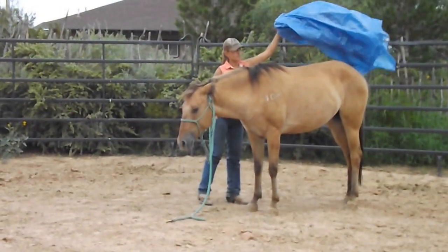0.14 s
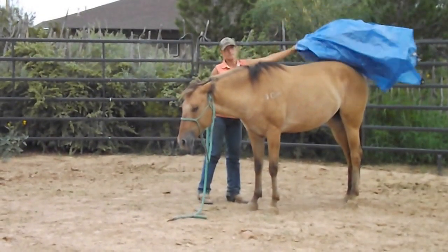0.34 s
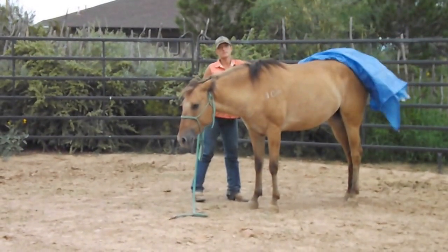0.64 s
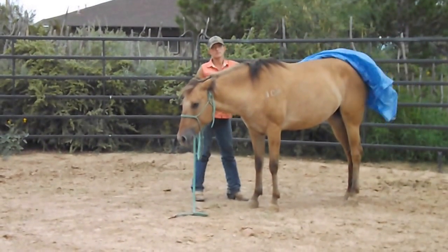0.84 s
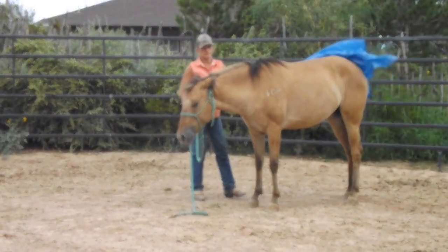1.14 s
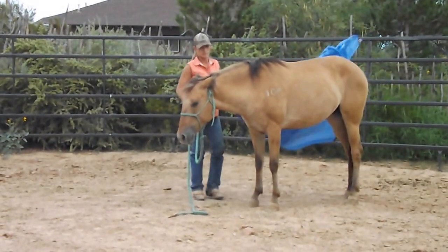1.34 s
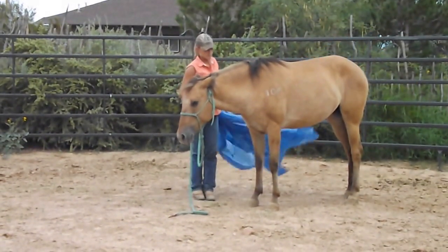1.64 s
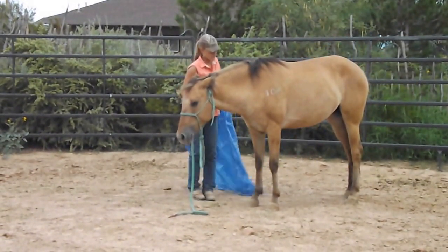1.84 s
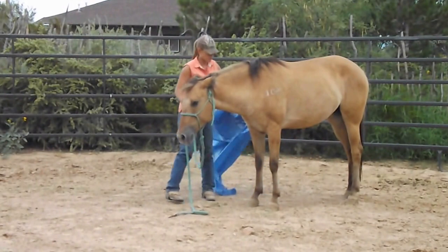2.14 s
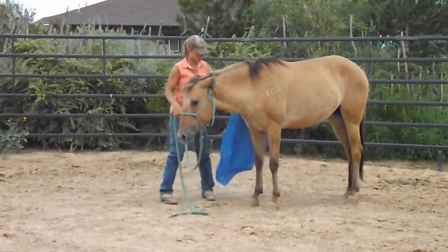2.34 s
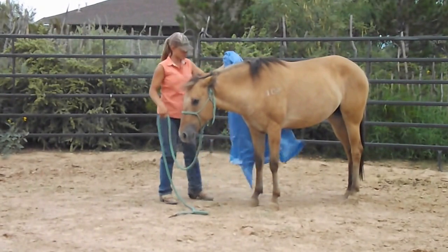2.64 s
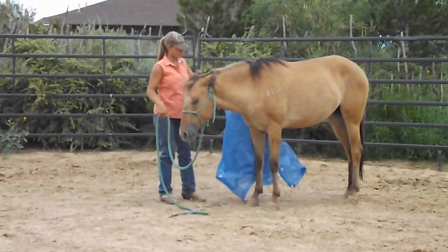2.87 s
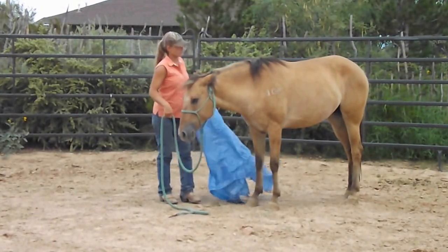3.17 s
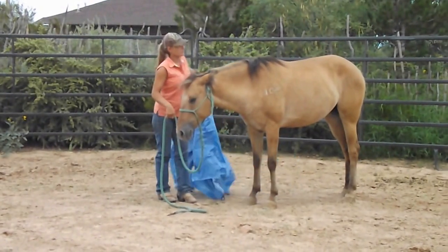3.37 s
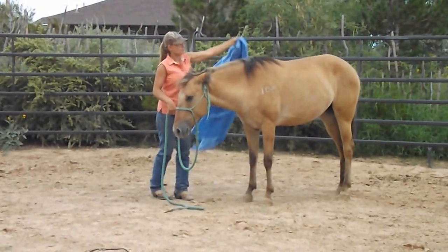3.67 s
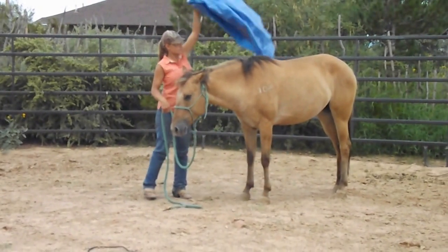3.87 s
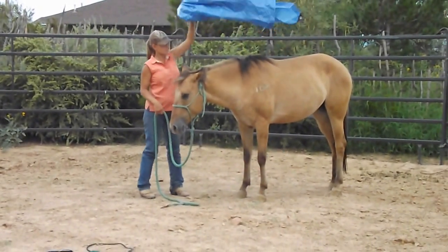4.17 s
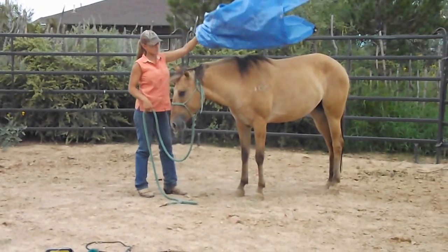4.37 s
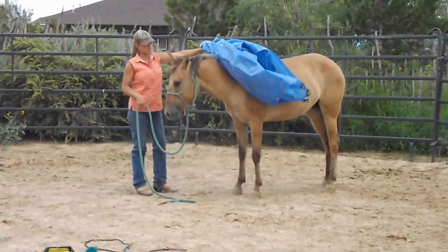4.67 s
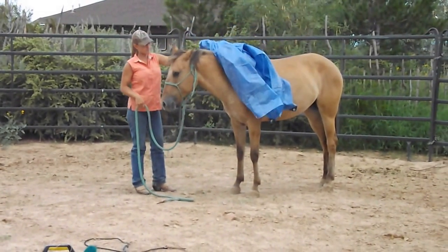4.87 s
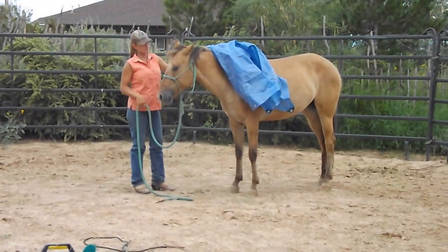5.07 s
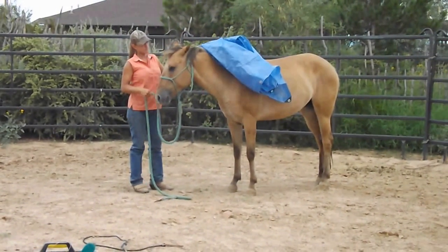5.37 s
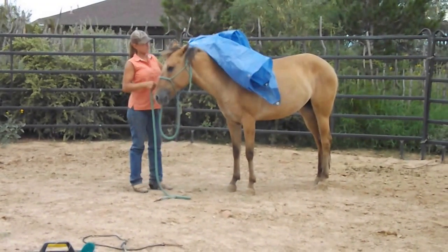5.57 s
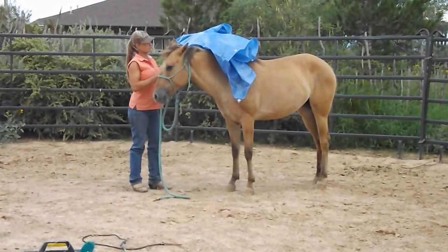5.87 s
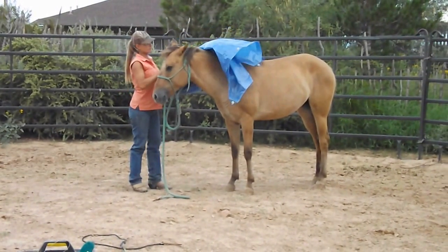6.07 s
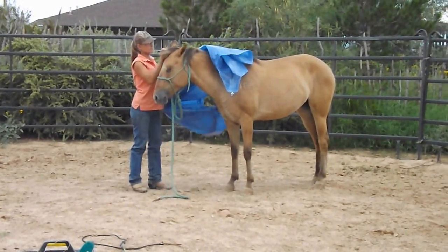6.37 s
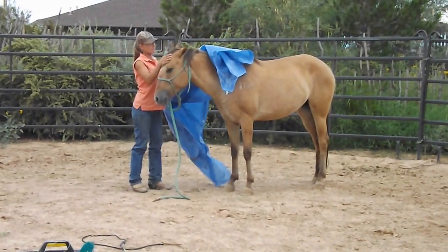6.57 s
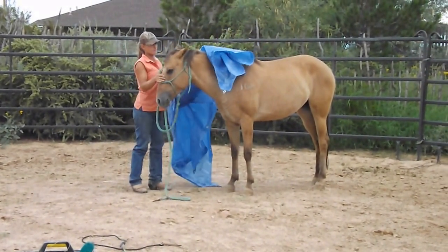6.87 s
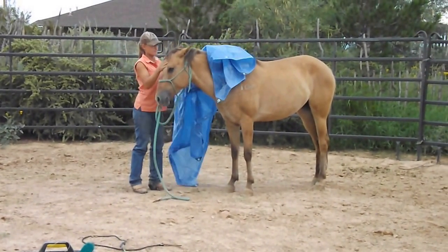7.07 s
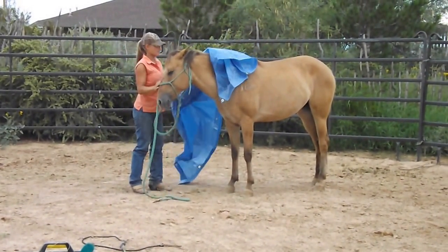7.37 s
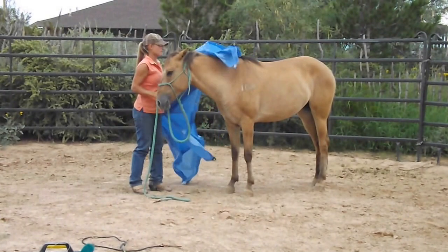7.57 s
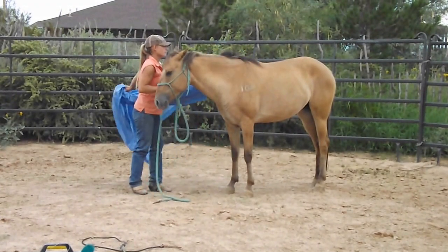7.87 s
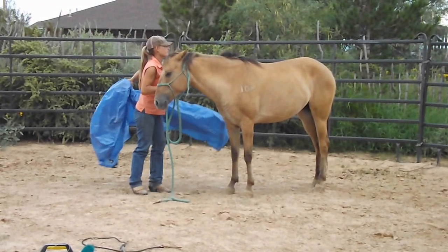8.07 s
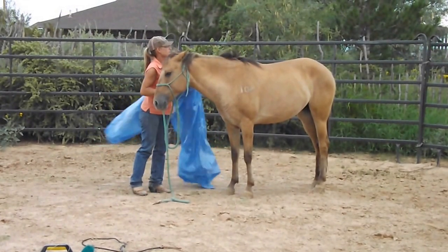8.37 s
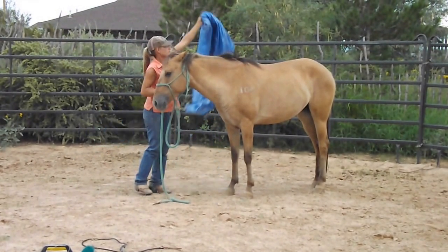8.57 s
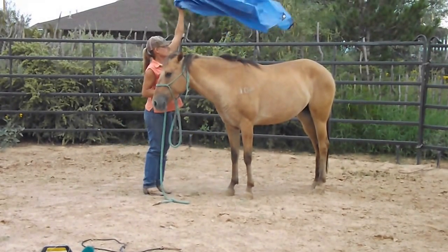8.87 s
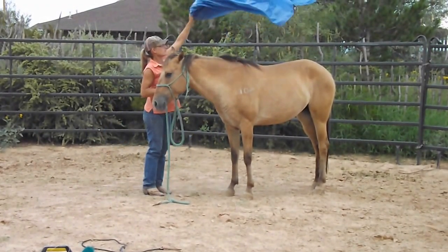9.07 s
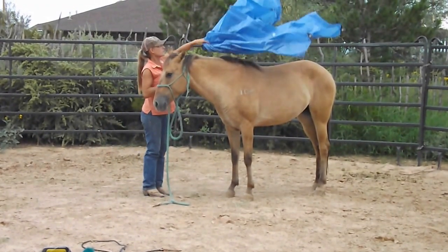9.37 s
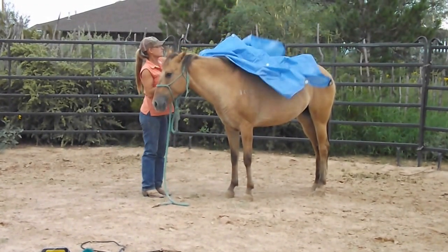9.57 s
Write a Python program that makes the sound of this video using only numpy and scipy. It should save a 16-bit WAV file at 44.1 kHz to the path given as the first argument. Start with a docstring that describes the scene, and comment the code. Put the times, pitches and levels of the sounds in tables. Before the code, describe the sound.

A plastic tarp is swept repeatedly over a horse in an open sandy pen. A brief rustle opens over heavy, lumpy wind rumble, then a full, boomy swish lands around 0.4 s and fades. Dry lens motor ticks, small and hollow, patter from 0.6 to 1.2 s, with one more near 1.6. At 1.8 s the tarp cracks hard and crinkles; another burst follows at 2.5, and bright snaps at 3.6-3.7. Ticks return from 3.7 to 4.05. Crackling surges at 4.5-4.9, ticks at 5.3-5.6 and two rapid rising bird chirps at 5.3 and 5.4. Rustling swells at 5.8, with louder ticks at 6.05-6.35, then crisp crinkles and snaps around 6.4-6.7 and a longer rustle at 7.3-7.6. After a lull, sweeps return from 8.3, with a strong snap at 8.6, rustling from 9.2, a faint chirp at 9.5 and a final crack at 9.7. Wind weakens over a soft hiss.

```python
"""A plastic tarp is swung and dragged over a horse in an outdoor pen: popping creases, a noise swish,
a short flutter after each pop, and sharp cracks where folds snap straight.
A lens motor ticks in short runs as uneven steps ring its barrel, and a bird chirps three times in
gliding tones with a faint echo. Wind rumbles on the microphone over a quiet wash, both coloured noise."""
import sys
import numpy as np
from scipy import signal
from scipy.fft import rfft, irfft
from scipy.io import wavfile
from scipy.ndimage import uniform_filter1d

SR = 44100
rng = np.random.default_rng(int(sys.argv[2]) if len(sys.argv) > 2 else 0)


def put_to_file(sound):
    """Save the sound as 16-bit audio at rate SR, in the file named by the first command-line argument."""
    columns = np.atleast_2d(sound).T  # one column per channel
    safe = np.clip(columns, -1, 1)
    whole_steps = np.round(safe * 32767)
    wavfile.write(sys.argv[1], SR, whole_steps.astype(np.int16))


N = 428652

# Sweeps, shakes and slaps of the tarp, levels ahead of colour and make-up gain. Each row: full strength
# in seconds, rustle in dB, swell in dB/s, hold in seconds, settling in dB/s, billow of large panels in dB.
TARP_MOVES = [(0.0, -41.5, 207, 0.0, 93, 9), (0.297, -43, 150, 0.064, 90, 2),
              (0.419, -33, 250, 0.021, 102, 8.5), (1.796, -31.5, 3000, 0.037, 200, 6.5),
              (1.9, -35.5, 500, 0, 40, 1.5), (2.3, -38.5, 53, 0.069, 79, -3),
              (2.503, -31.5, 192, 0.02, 114, 0.5), (2.577, -35, 100, 0.022, 155, -3),
              (2.96, -41.5, 46, 0.17, 61, 3), (3.41, -38, 153, 0, 60, -1), (3.646, -37.5, 59, 0.1, 57, 0),
              (4.512, -35.5, 600, 0.054, 90, -0.5), (4.691, -33.5, 104, 0.044, 75, 7.5),
              (4.91, -39.5, 152, 0.045, 60, 1), (5.51, -38.5, 24, 0.15, 60, 1.5),
              (5.79, -34.5, 88, 0.0044, 111.5, 0), (6.122, -38, 58, 0.034, 23, 1.5),
              (6.557, -37, 200, 0, 132, -11), (6.653, -36, 152, 0.018, 150, -1),
              (6.94, -39.5, 42, 0.11, 47, -4), (7.338, -35, 157, 0.22, 42, 0),
              (8.302, -37, 200, 0.098, 90, 7), (8.42, -36.5, 75, 0.2, 118, -3.5),
              (9.248, -37.5, 107, 0.099, 71, 3.5), (9.497, -35, 202, 0.2, 88, 6.5)]
# The sheet sliding and hanging between moves, same level scale.
# Each row: time in seconds, rustle in dB, billow in dB.
TARP_DRAG = [(0.0, -56, 4), (0.36, -47, 5), (0.52, -37, 6.5), (1.76, -46, -3.5), (2.8, -50.5, -11),
             (4.038, -42.5, 9), (4.12, -48.5, -2), (4.46, -41.5, 5), (5.0, -45.5, 9), (5.2, -49.5, 19),
             (6.4, -41.5, -3), (6.8, -52, -23), (7.7, -42.5, 1), (7.9, -49.5, -10), (8.3, -41, 0.5),
             (9.17, -41, -1), (9.72, -51, -11)]
# Crispness, treble and low thud against the middle. Each row: time in seconds, lift in dB.
TARP_CRISPNESS = [(0.0, 8.5), (0.5, 2), (1.75, 5), (3.4, 5.5), (4.6, 1.5), (6.7, 4), (7.3, 2), (7.9, 6.5),
                  (8.9, 1.5)]
# Spectrum of the plastic. Each row: frequency in Hz, relative density in dB per Hz.
TARP_SPECTRUM = [(88, -19), (150, -8.5), (264, -10), (472, -17), (846, -3.5), (1070, -9.5), (1770, -1),
                 (2190, -4), (2610, 3.5), (2800, 0), (2990, 2), (3400, -2.5), (5150, -16.5), (6140, -24),
                 (15600, -50.5)]
# Folds that snap straight. Each row: start in seconds, peak in dB, thinness in dB per octave.
FOLD_SNAPS = [(0.398, -26, 3), (0.872, -25.5, 4.5), (1.799, -22, -3.5), (1.809, -26, -6), (1.826, -21, -2),
              (2.51, -24, -9), (3.608, -25, 1), (3.677, -18, 0), (3.692, -33, -3), (4.495, -24.5, -0.5),
              (4.8798, -22.5, -3), (5.636, -24, -2), (6.401, -29, 6.5), (6.548, -25, 1.5), (6.5792, -27, 0),
              (6.643, -27, 6), (7.5086, -29, 9), (7.9524, -30.5, 7), (8.3988, -28, 5), (8.5961, -18.5, 0.5),
              (9.699, -21.5, 2.5)]
# Lens motor moves. Each row: time in seconds (stepping starts 2 ms sooner), peak in dB,
# length in seconds, ring pitch in Hz.
LENS_MOVES = [(0.645, -31, 0.018, 965), (0.757, -26.5, 0.011, 950), (0.847, -25.5, 0.011, 986),
              (0.87, -29, 0.013, 930), (0.947, -27, 0.016, 980), (0.98, -29, 0.015, 945),
              (1.049, -29, 0.014, 1030), (1.12, -23.5, 0.013, 977), (1.164, -24.5, 0.019, 973),
              (1.585, -29.5, 0.01, 944), (3.665, -29, 0.017, 1024), (3.771, -29.5, 0.015, 950),
              (3.865, -27, 0.017, 966), (3.969, -25.5, 0.0077, 990), (4.001, -30, 0.014, 1040),
              (4.047, -22.5, 0.0095, 974), (5.282, -33, 0.026, 1038), (5.4, -23.5, 0.015, 975),
              (5.491, -23, 0.015, 980), (5.602, -35, 0.013, 960), (6.043, -20.5, 0.0097, 990),
              (6.145, -26, 0.023, 950), (6.239, -23.5, 0.014, 995), (6.348, -31, 0.015, 986)]
# Modes of the lens barrel. Each row: share of the ring pitch, width in Hz of the first of two
# resonances in series, relative level in dB.
BARREL_MODES = [(0.98, 137, 19.5), (0.32, 208, 10.5), (0.545, 320, 6)]
RINGS_PER_STEP = 4.024  # the barrel rings near the fourth multiple of the step rate
BRAKE_T60, BRAKE_FLOOR_DB = 0.012, -7  # s per 60 dB once the move stops, and the most it takes off
# Chirps. Each row: passing of LOUDEST_HZ in seconds, level in dB ahead of the voice curve, lowest pitch
# in Hz, pitch in Hz above which the voice thins, highest pitch in Hz, glide in Hz/s.
BIRD_CHIRPS = [(5.301, -20.5, 2035, 3280, 4060, 35000), (5.433, -19, 1620, 4210, 5660, 50000),
               (9.5, -28, 2000, 3400, 3320, 36500)]
# Strength of the bird's voice by pitch. Each row: pitch in Hz, relative level in dB.
BIRD_VOICE = [(1550, -26), (2150, -13), (2500, -6), (2850, -6.5), (3080, 2), (3430, -9), (3750, -5),
              (4300, -10.5), (5600, -19)]
LOUDEST_HZ, THIN_DB = 3020, -13
ECHO_S, ECHO_DB, YARD_DB, YARD_T60 = 0.022, -17, -14, 0.3  # one fence echo, then a diffuse tail (T60 in s)
# Gusts on the microphone. Each row: time in seconds, rumble in dB about which it wavers.
WIND_GUSTS = [(0.0, -28.5), (0.25, -26), (0.36, -33), (1.14, -36), (2.3, -31.5), (3.06, -37.5),
              (4.71, -37.5), (5.6, -42.5), (5.71, -33.5), (6.63, -43.5), (9.72, -42)]
# Spectrum of the rumble ahead of rounding. Each row: frequency in Hz, relative density in dB per Hz.
WIND_SPECTRUM = [(7.1, -66), (12, 11), (36, 0), (53, 1), (96, -11), (250, -31), (880, -120)]
# Average spectrum of the wash. Each row: frequency in Hz, relative density in dB per Hz.
AIR_SPECTRUM = [(88, 8), (150, 2), (541, -11), (914, -2), (1130, -9), (2230, -7), (2560, -21), (3050, -2),
                (3930, -18.5), (15600, -30.5)]
AIR_DB = -45  # rms
# Random stereo spread, widest in the treble. Each row: frequency in Hz, spread in dB.
STEREO_SPREAD = [(200, -75), (900, -32), (3500, -22), (8000, -12)]
LEFT_LAG = 1  # most samples by which the left channel lags, less towards the bass
EDGE_HZ = 15757  # upper band limit


def gain_of(db):
    """Turns decibels into an amplitude factor."""
    return 10 ** (np.asarray(db) / 20)


def evened(x):
    """Scales to rms 1."""
    return x / np.sqrt(np.mean(x ** 2) + 1e-20)


def read(points, hz):
    """Reads a spectrum on a log-frequency axis."""
    f, value = np.transpose(points)
    return np.interp(np.log(hz + 1), np.log(f + 1), value)


def add(mix, s, sound):
    """Mixes a sound in at time s."""
    part = mix[round(s * SR):][:len(sound)]
    part += sound[:len(part)]


def drift(shape, spans):
    """Smooth chance of rms 1, averaged over the given spans along each axis."""
    x = rng.standard_normal(shape)
    for axis, span in enumerate(spans):
        x = uniform_filter1d(x, max(round(span), 1), axis=axis)
    return evened(x)


def coloured(x, size, db_at):
    """Filters x by a dB field over frequency and time."""
    overlap = size * 3 // 4
    hz, t, z = signal.stft(x, SR, nperseg=size, noverlap=overlap)
    return signal.istft(z * gain_of(db_at(hz, t)), SR, nperseg=size, noverlap=overlap)[1][:N]


def resonate(x, hz, width):
    """A resonance near gain 1 that follows the curve hz: shift to zero, smooth, shift back."""
    turn = np.exp(2j * np.pi * np.cumsum(hz) / SR)
    r = np.exp(-np.pi * width / SR)
    return 2 * (turn * signal.lfilter([1 - r], [1, -r], x / turn)).real


def handling(t):
    """Rustle level and billow over time: the moves add their power to the sliding sheet."""
    at, db, swell, hold, settle, billow_db = np.transpose(TARP_MOVES)[:, :, None]
    before_db = swell * (at - t)
    after_db = settle * (t - at - hold)
    under_db = np.maximum(np.maximum(before_db, after_db), 0)
    s, drag_db, drag_billow_db = np.transpose(TARP_DRAG)
    power = gain_of(2 * np.vstack([db - under_db, np.interp(t, s, drag_db)]))
    billow = (power[:-1] * billow_db).sum(0) + power[-1] * np.interp(t, s, drag_billow_db)
    return 10 * np.log10(power.sum(0)), billow / power.sum(0)


def tarp_field(hz, t, patchy_db=1.5):
    """Billow booms in the panels' band, crispness lifts treble and thud, and small patches waver."""
    octaves = np.log2(hz + 1)[:, None]
    panels = np.exp(-((octaves - np.log2(760)) / .5) ** 2)  # air-filled panels boom in one band
    treble = np.clip(octaves - np.log2(3500), 0, 1)
    thud = np.clip(np.log2(600) - octaves, 0, 1)
    crisp_db = np.interp(t, *np.transpose(TARP_CRISPNESS))
    colour = panels * handling(t)[1] + (treble + thud) * crisp_db
    return colour + patchy_db * drift((len(hz), len(t)), [4, 30])


def tarp(creases_per_s=4000, spread_db=3.0, tick_db=4.0, clump_db=1.0, swish=0.48, flutter=0.48):
    """Creases pop in clumps over the swish of sheet on hair; each pop leaves a short flutter."""
    strength = np.minimum(rng.exponential(1, (2, N)), [[2.5], [4.5]])
    pops = gain_of(np.array([[spread_db], [tick_db]]) * strength)
    pops = pops * (rng.random((2, N)) < creases_per_s / SR)
    broad, fine = pops * rng.choice([-1., 1.], (2, N)) * gain_of(clump_db * drift(N, [350]))
    # broad folds thud below the split, fine creases tick above it
    split = signal.firwin(63, 3500, fs=SR)
    broad, fine = evened(broad), evened(fine)
    pops = evened(fine + np.convolve(broad - fine, split, "same"))
    decay = gain_of(-120 * np.arange(1500) / SR / 0.051)  # power falls 60 dB per 51 ms
    ringing = np.sqrt(np.abs(signal.oaconvolve(pops ** 2, decay)[:N]))
    at = np.arange(0, N, 32) / SR
    level_db = np.interp(np.arange(N) / SR, at, handling(at)[0])
    swish = swish * gain_of(0.5 * (level_db + 39.5))  # louder handling blurs pops into a denser swish
    drive = pops + (swish + flutter * evened(ringing)) * rng.standard_normal(N)
    rustle = drive / np.sqrt(2 + swish ** 2) * gain_of(level_db)
    moving = coloured(rustle, 256, tarp_field)
    return gain_of(11.5) * coloured(moving, 1024, lambda hz, t: read(TARP_SPECTRUM, hz)[:, None])


def snaps():
    """A fold cracks and its panel flutters for some 20 ms; positive thinness tilts it bright."""
    out, t, hz = np.zeros(N), np.arange(1024) / SR, np.fft.rfftfreq(2048, 1 / SR)
    lead = 100  # samples of room ahead of the crack for the filter
    for (s, db, tilt_db), noise in zip(FOLD_SNAPS, rng.standard_normal((len(FOLD_SNAPS), len(t)))):
        burst = np.minimum(t / 0.0013, 1) * gain_of(-60 * t / 0.051) * noise
        burst = np.roll(np.pad(burst, (0, 1024)), lead)
        colour_db = read(TARP_SPECTRUM, hz) + tilt_db * np.log2((hz + 100) / 3000)
        crack = irfft(rfft(burst) * gain_of(colour_db))
        add(out, s - lead / SR, gain_of(db) * crack / np.abs(crack).max())
    return out


def lens():
    """Each move is a few uneven motor steps that ring the barrel, then a brief partial damping."""
    out = np.zeros(N)
    t = np.arange(2500) / SR
    for (s, db, length, ring_hz), jitter in zip(LENS_MOVES, rng.standard_normal((len(LENS_MOVES), 12))):
        at = np.arange(0, max(length, .002), RINGS_PER_STEP / ring_hz)[:12]
        count = len(at)
        push = np.sin(np.pi * (np.arange(count) + 1) / (count + 1)) ** .5  # strongest in mid-move
        steps = np.zeros(len(t))
        step_at = np.round(np.abs(at + .00013 * jitter[:count]) * SR).astype(int)
        steps[step_at] = push * (1 + .3 * jitter[::-1][:count])
        # pitch bends a little over the move
        hz = ring_hz * (1 + 3.2 * jitter[0] * (np.minimum(t, length) - length / 2))
        ring = np.zeros(len(t))
        for share, width, mode_db in BARREL_MODES:
            first = resonate(steps, share * hz, width)
            ring += gain_of(mode_db) * resonate(first, share * hz, width * 0.39)
        ring *= gain_of(np.clip(-60 * (t - length) / BRAKE_T60, BRAKE_FLOOR_DB, 0))
        add(out, s - .002, gain_of(db) * ring / np.abs(ring).max())
    return out


def bird():
    """Rising whistles, thrown back faintly by the fence and the yard."""
    out, t = np.zeros(N), np.arange(8000) / SR
    yard = rng.standard_normal(len(t)) * gain_of(-60 * t / YARD_T60) * (t > ECHO_S)
    yard = gain_of(YARD_DB) * yard / np.linalg.norm(yard)
    yard[0], yard[round(ECHO_S * SR)] = 1, gain_of(ECHO_DB)
    for s, db, low_hz, thin_hz, high_hz, glide in BIRD_CHIRPS:
        hz = np.arange(low_hz, high_hz, glide / SR)
        wavering_hz = hz + 60 * drift(len(hz), [300])
        tone = np.sin(2 * np.pi * np.cumsum(wavering_hz) / SR) * signal.windows.tukey(len(hz), .06)
        level_db = db + read(BIRD_VOICE, hz) + THIN_DB * np.clip((hz - thin_hz) / 150, 0, 1)
        level_db = level_db + 0.45 * drift(len(hz), [120])
        tone = np.sqrt(2) * gain_of(level_db) * tone  # root two makes the level an rms
        add(out, s - (LOUDEST_HZ - low_hz) / glide, signal.fftconvolve(tone, yard))
    return out


def wind():
    """Low lumpy pressure from eddies across the microphone, its largest swings rounded off."""
    s, db = np.transpose(WIND_GUSTS)
    rumble = coloured(rng.standard_normal(N), 3867, lambda hz, t: read(WIND_SPECTRUM, hz)[:, None])
    rounded = evened(np.tanh(0.47 * evened(rumble)))
    return rounded * gain_of(np.interp(np.arange(N) / SR, s, db) + 1.04 * drift(N, [3000]))


def air():
    """Wash of leaves, distance and microphone hiss, wavering gently and most in the lower bands."""
    def field(hz, t):
        waver_db = 2.14 * np.exp(-hz / 5000)[:, None] * drift((len(hz), len(t)), [10, 15])
        return read(AIR_SPECTRUM, hz)[:, None] + waver_db
    return gain_of(AIR_DB) * evened(coloured(rng.standard_normal(N), 1024, field))


def scene():
    """All sources reach both channels alike."""
    return np.tile(tarp() + snaps() + lens() + bird() + wind() + air(), (2, 1))


def record(dry):
    """Random stereo spread, widest in the treble, and a slight lag on the left; then the band limit."""
    hz, t, z = signal.stft(dry, SR, nperseg=512)
    a, b = rng.standard_normal((2,) + z.shape[1:])
    spread = (a + 1j * b) * gain_of(read(STEREO_SPREAD, hz))[:, None]
    # the left channel lags by up to one sample, less towards the bass
    lag_samples = LEFT_LAG * np.clip(hz / 2700, 0, 1) ** 1.5
    lag = np.exp(-2j * np.pi * hz * lag_samples / SR)[:, None]
    heard = signal.istft(z * [(1 + spread) * lag, 1 - spread], SR, nperseg=512)[1][:, :N]
    band = signal.firwin(1023, EDGE_HZ, window=("kaiser", 9), fs=SR)
    return signal.oaconvolve(heard, band[None], "same")


dry = scene()
out = record(dry)
put_to_file(out)
```